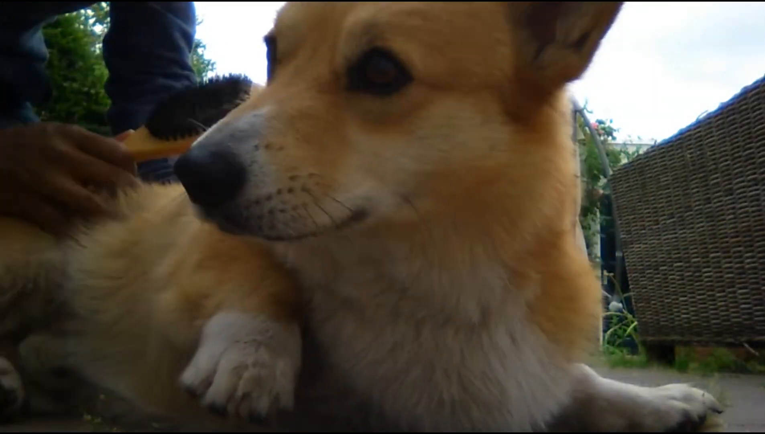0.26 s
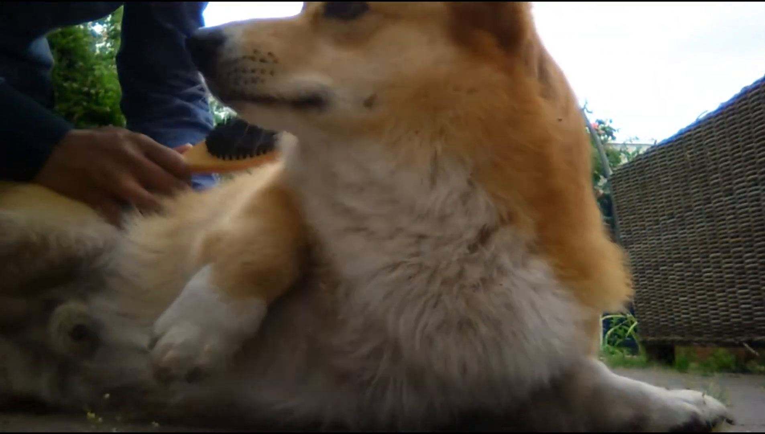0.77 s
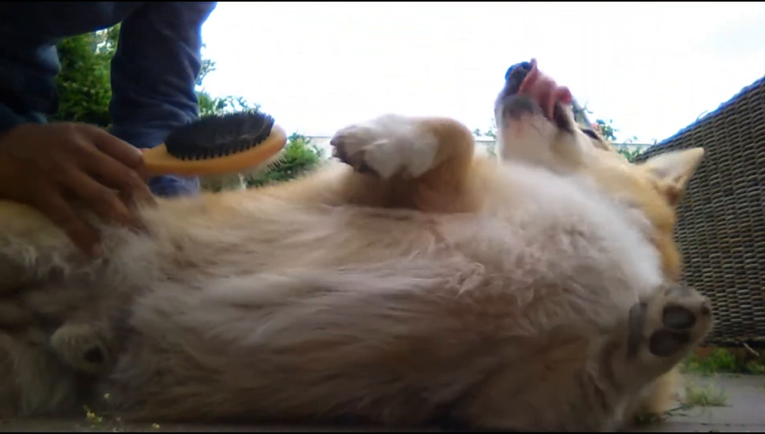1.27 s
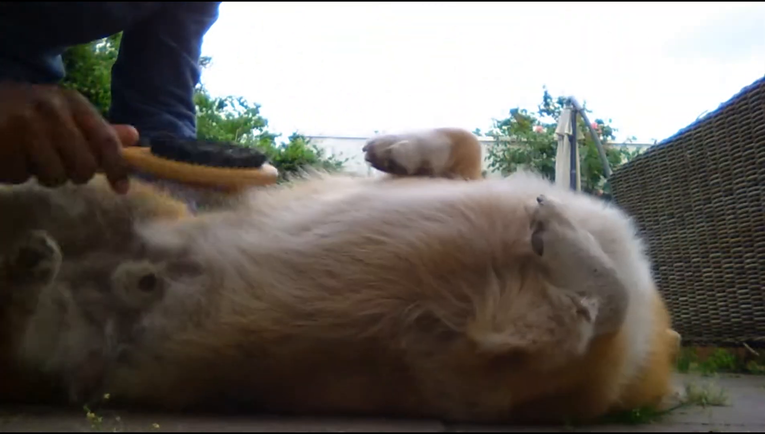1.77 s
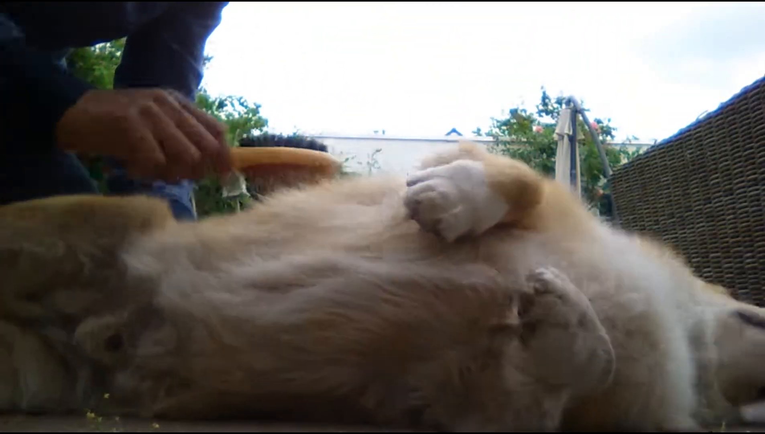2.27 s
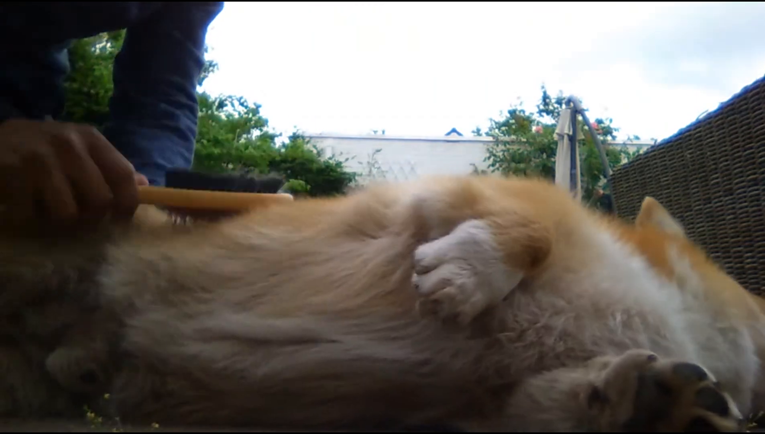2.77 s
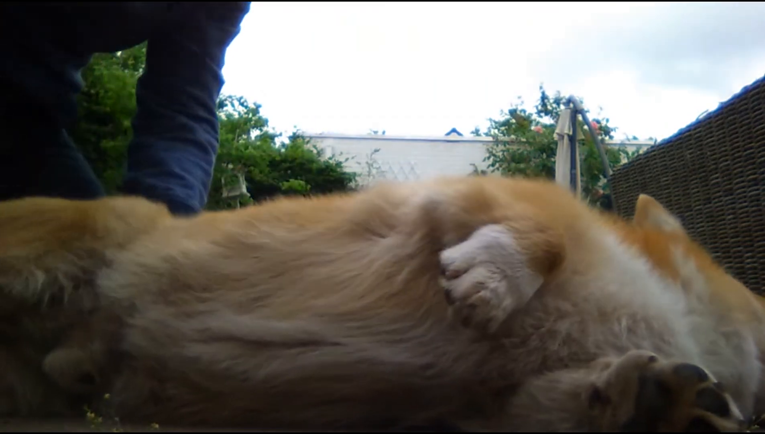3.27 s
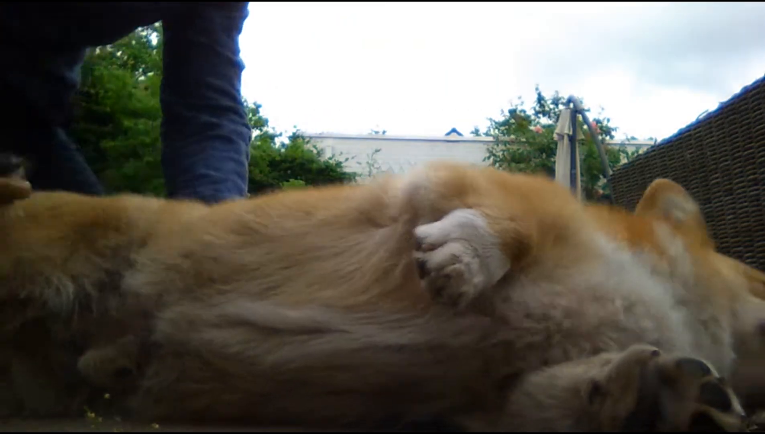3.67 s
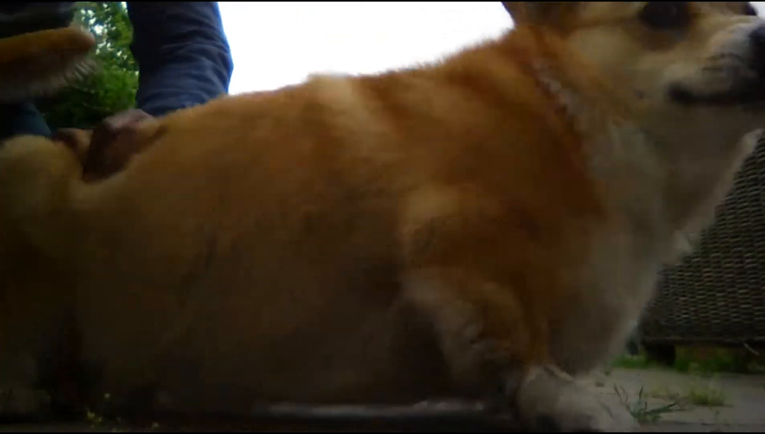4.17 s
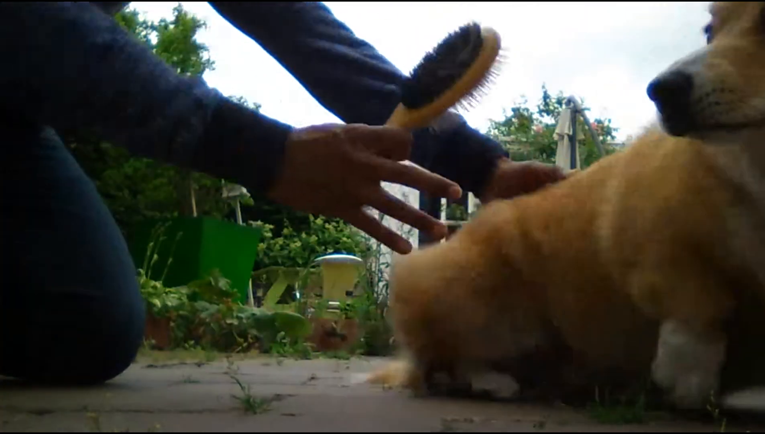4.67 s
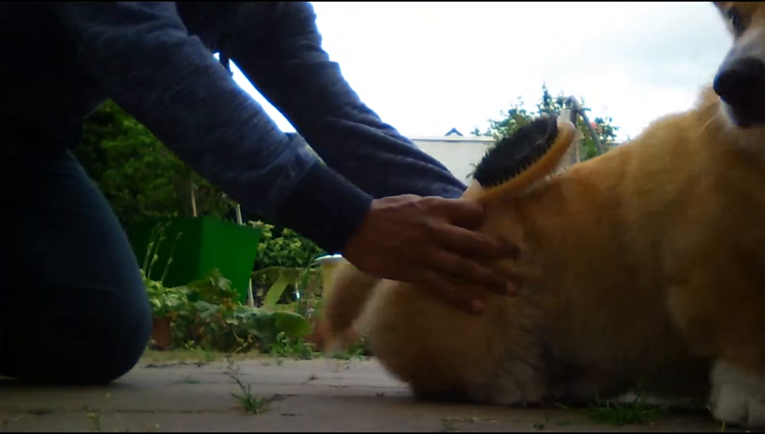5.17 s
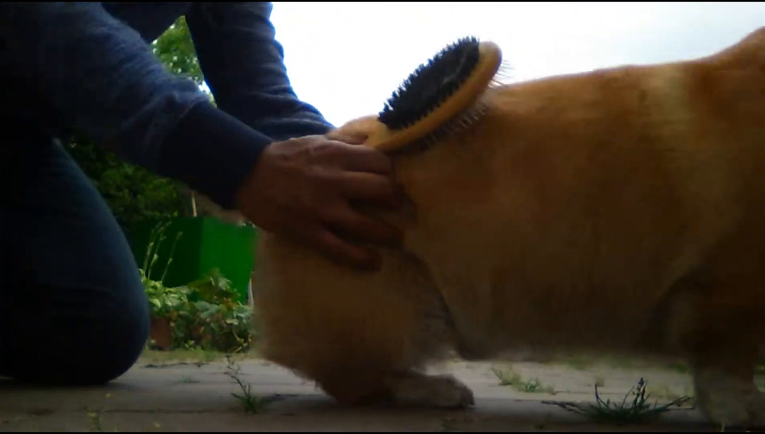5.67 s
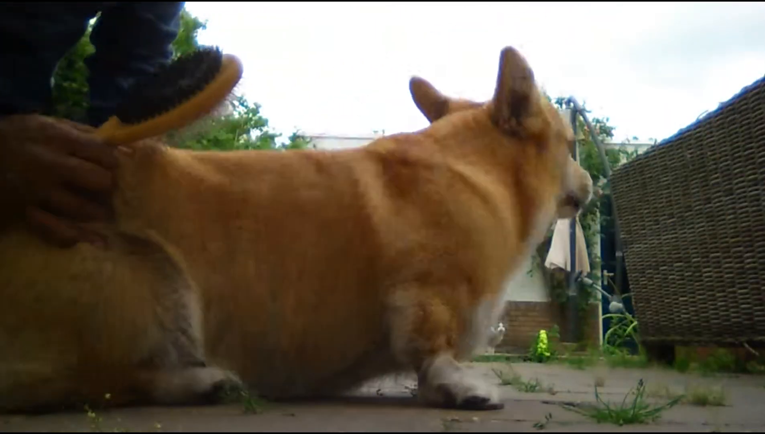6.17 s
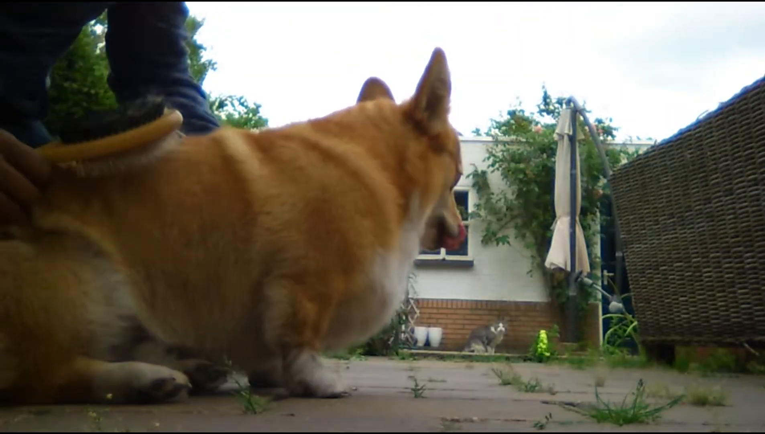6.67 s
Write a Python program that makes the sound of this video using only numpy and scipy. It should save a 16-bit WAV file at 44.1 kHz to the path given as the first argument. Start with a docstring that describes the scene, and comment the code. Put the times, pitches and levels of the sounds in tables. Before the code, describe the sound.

Faint brush strokes through dog fur and soft low knocks on a quiet patio, then a loud hollow clattering scramble and fading rustle.

```python
"""Dog brushed on a patio

On a garden patio a small recorder lies close to the paving while a dog is brushed beside it.
Bristles, hands and paws rustle in the coat and on the slabs: shaped noise, clicks and tiny twangs.
The dog's shifting weight drags and knocks on something hollow near the microphones: struck, ringing modes.
Soft thuds, short hoots and thin tones appear; filtered noise makes the wind, garden air and recorder hiss."""
import sys
import numpy as np
from scipy import signal
from scipy.fft import rfft, irfft, next_fast_len
from scipy.io import wavfile
from scipy.ndimage import uniform_filter1d

SR = 44100
rng = np.random.default_rng(int(sys.argv[2]) if len(sys.argv) > 2 else 0)


def dump(signal):
    """Clip the signal to [-1, 1] and save it as 16-bit WAV at the path in sys.argv[1]."""
    limited = np.clip(np.atleast_2d(signal).T, -1, 1)
    pcm = np.round(limited * 32767).astype(np.int16)
    wavfile.write(sys.argv[1], SR, pcm)


N = 305786
LONG = next_fast_len(N)
T, HZ = np.arange(N) / SR, np.fft.rfftfreq(LONG, 1 / SR)


def amp(db):
    """Decibels to amplitude."""
    return np.exp(np.asarray(db) * (np.log(10) / 20))


def evened(x):
    """Scales x to rms 1."""
    return x / np.sqrt(np.mean(x ** 2) + 1e-20)


def filtered(x, gain):
    """Multiplies the spectrum of x by a gain curve on HZ."""
    return irfft(rfft(x, LONG) * gain, LONG)[..., :N]


def read(points, hz=HZ):
    """Columns of a spectrum table, joined on a log-frequency axis."""
    f, *values = np.transpose(points)
    return [np.interp(np.log(hz + 1), np.log(f + 1), v) for v in values]


def follow(table, rest_db=-120):
    """Columns of a curve table at every sample; outside it the level falls to rest."""
    (first_s, _, *first_rest), (last_s, _, *last_rest) = table[0], table[-1]
    before, after = (first_s - .01, rest_db, *first_rest), (last_s + .01, rest_db, *last_rest)
    s, *values = np.transpose([before, *table, after])
    return [np.interp(T, s, v) for v in values]


def coloured(x, points):
    """Filters x to a spectrum; rms 1."""
    return evened(filtered(x, amp(read(points)[0])))


def flutter(per_s):
    """Slow chance of rms 1: noise kept below about per_s Hz."""
    return evened(filtered(rng.standard_normal(N), 1 / (1 + (HZ / per_s) ** 4)))


def grains(per_s, spread_db):
    """Sparse clicks of random sign, a few of them large; rms 1."""
    size = amp(spread_db * np.minimum(rng.exponential(1, N), 5)) * rng.choice([-1., 1.], N)
    return evened(size * (rng.random(N) < per_s / SR))


def add(mix, s, sound):
    """Lays a sound into the mix from s seconds on, cut at the end of the mix."""
    part = mix[round(s * SR):][:len(sound)]
    part += sound[:len(part)]


def pair(source, table):
    """Two microphone ports hear a source; where they are unlike, the left mixes in a second playing."""
    like, lead, balance_db = read(table)
    like, left = np.clip(like, 0, 1), amp(balance_db)
    x, other = rfft(source(), LONG), rfft(source(), LONG)
    mean = np.sqrt(1 + left ** 2 + 2 * left * like * np.cos(lead)) / 2  # level of the two ports' average
    left_port = left * (like * np.exp(1j * lead) * x + np.sqrt(1 - like ** 2) * other)
    return irfft([left_port, x] / mean, LONG)[:, :N]


# gusts on the ports: top_s, top_level_db, fade_db_per_s
GUSTS = [(0.0, -56, 22), (0.65, -46.5, 34), (2.1, -52.5, 33), (3.01, -48, 20), (3.9, -40.5, 35),
         (5.75, -49.5, 32), (6.7, -52.5, 9)]
# colour of the wind rumble at the ports: frequency_hz, density_db_per_hz (relative)
WIND_SPECTRUM = [(12, 2), (20, 2), (59, 3), (140, -9.5), (200, -10), (260, -43), (440, -120)]
# colour of the distant garden air: frequency_hz, density_db_per_hz (relative)
AIR_SPECTRUM = [(47, -40), (80, -9), (289, -9.5), (523, -18), (717, -15.5), (1150, -18.5), (1710, -25.5),
                (4250, -28.5), (5830, -34), (7240, -43.5), (9000, -36), (11700, -74), (19800, -120)]
AIR_DB, BREEZE_DB, GUST_RISE_DB_PER_S = -61.5, -57, 180


def outdoors():
    """Lumpy bass wind, with gusts that rise fast and fade slowly, over the garden's soft wash and thin tones."""
    gusts_db = []
    for top_s, db, fade in GUSTS:
        fall_db = np.where(T < top_s, GUST_RISE_DB_PER_S * (top_s - T), fade * (T - top_s))
        gusts_db.append(db - fall_db)
    level_db = np.maximum(np.max(gusts_db, axis=0), BREEZE_DB)
    wind = coloured(rng.standard_normal(N), WIND_SPECTRUM) * amp(level_db + 2.16 * flutter(6.6))
    air = coloured(rng.standard_normal(N), AIR_SPECTRUM) * amp(AIR_DB + 0.09 * flutter(4.5))
    return wind + air + tones()


# short thin tones, most of them faint: start_s, length_s, first_pitch_hz, last_pitch_hz, level_db
TONES = [(0.0, .18, 1193, 1190, -64), (1.32, .12, 1175, 1200, -63), (1.39, .15, 1335, 1360, -64),
         (1.33, .08, 570, 680, -63), (.872, .07, 675, 630, -52), (6.17, .25, 725, 740, -68),
         (6.53, .2, 365, 395, -65)]


def tones():
    """Thin gliding sines whose pitch and level waver, faded at both ends."""
    out, waver, drift = np.zeros(N), flutter(32), flutter(32)
    for s, length, first_hz, last_hz, db in TONES:
        count = round(length * SR)
        hz = np.linspace(first_hz, last_hz, count) * (1 + .005 * drift[round(s * SR):][:count])
        add(out, s, amp(db) * signal.windows.tukey(count, .4) * np.sin(2 * np.pi * np.cumsum(hz) / SR))
    return out * amp(2.2 * waver)


def handled():
    """All that reaches the ports through the hollow thing, which passes no deep bass."""
    return signal.sosfilt(signal.butter(4, 95, "high", fs=SR, output="sos"), drag() + knocks())


# modes of the hollow thing near the microphones: pitch_hz, level_db (relative), t60_s (each use scales it)
HOLLOW = [(155.6, -2.5, 0.52), (201.7, 1, 0.23), (298.8, -0.5, 0.22), (346, -6, 0.25), (398.6, -7, 0.21),
          (497.3, -4.5, 0.18), (632, -0.5, 0.055), (729, -4.5, 0.13), (851.5, -4.5, 0.07), (1098, -9, 0.09),
          (1420, -17, 0.14), (1738, -19.5, 0.076), (2140, -25, 0.088), (2293, -11.5, 0.023),
          (2556, -27, 0.2), (2900, -12, 0.018)]


def ring(hard_db, longer, luck_db=0, phases=0, bend=1):
    """The hollow thing's modes after one impulse; a harder blow lifts the upper ones."""
    hz, db, t60 = np.transpose(HOLLOW)[:, :, None]
    t, sign = T[:SR // 3], (-1) ** np.arange(len(HOLLOW))[:, None]
    decay_db = 60 * t / (t60 * longer)
    size = sign * amp(db + luck_db + hard_db * np.log2(hz / 300) - decay_db)
    return (size * np.sin(2 * np.pi * hz * bend * t + phases)).sum(0)


# blows on the hollow thing: start_s, level_db, hardness_db_per_octave, ring_time_factor,
# favoured_pitch_hz (that of the struck spot)
KNOCKS = [(0.0, -49.5, 5, 1, 202), (0.291, -45.5, 1, 1.12, 346), (0.33, -54.5, 1, 2.1, 785),
          (0.473, -51.5, 0.5, 1.1, 290), (0.699, -48.5, -1, 0.83, 272), (0.828, -38.5, 2, 0.55, 372),
          (0.855, -39.5, 2.5, 0.41, 850), (0.874, -46.5, 5, 1.4, 630), (1.123, -51.5, -5.5, 1.2, 400),
          (1.613, -51, 5.5, 1.5, 288), (1.811, -40.5, 0, 0.82, 330), (2.475, -50.5, 5.5, 1.6, 346),
          (3.355, -41.5, 5.5, 1.5, 810), (3.39, -39, -1, 1.3, 795), (3.472, -34.5, 7, 0.37, 385),
          (3.487, -25, 2.5, 0.41, 292), (3.497, -18, -2, 1.11, 177.6), (3.607, -20.5, -1.5, 1.12, 740),
          (3.708, -29, -1.5, 1.46, 780), (3.725, -21.5, 0.5, 0.2, 173), (3.753, -31, 1, 0.17, 181),
          (3.781, -26, -1.5, 0.51, 204), (3.824, -28, -8.5, 1.1, 196), (3.886, -29.5, -14.5, 0.85, 343),
          (3.927, -20, 5, 1.1, 950), (3.958, -24.5, 1, 0.52, 290), (4.031, -28, -4, 0.72, 484),
          (4.111, -38, 5.5, 1.1, 308), (4.171, -38, 7, 0.68, 860), (4.211, -33, 1, 1.4, 204),
          (4.305, -36.5, -24, 0.25, 195)]
CONTACT_S = 0.0024
CHATTER, CHATTER_S = .5, .006  # largest share of a rebound, typical delay
WOBBLE_DB = 3.2  # random wobble of each mode's level
DETUNE = .03  # largest share of a mode's pitch
FAVOUR_DB, FAVOUR_OCTAVES = 11.5, 0.22


def knocks():
    """Blows on different spots start the modes in other mixes, detune them a little at random, and rebound."""
    out, luck = np.zeros(N), rng.uniform(-0.857, 1, (len(KNOCKS), 3, len(HOLLOW), 1))
    modes_hz, wobble = np.transpose(HOLLOW)[0][:, None], np.tile(flutter(37), 2)
    t = T[:SR // 3]
    for (s, db, hard_db, longer, spot_hz), (size, start, detune) in zip(KNOCKS, luck):
        octaves_off = np.log2(modes_hz / spot_hz)
        mix_db = 4 * size + FAVOUR_DB * np.exp(-(octaves_off / FAVOUR_OCTAVES) ** 2)
        # the wobble is read from another place per mode
        mix_db = mix_db + WOBBLE_DB * wobble[(abs(size) * N).astype(int) + np.arange(len(t))]
        sound = ring(hard_db, longer, mix_db, np.pi * start, 1 + DETUNE * detune)
        sound = sound * (1 - np.exp(-t / CONTACT_S))  # builds over the contact time
        for share, lag in zip(start[:3, 0], detune[:3, 0]):  # rebounds of random size and delay
            delay_s = CHATTER_S * (1 + lag)
            rebound = np.roll(sound, round(delay_s * SR)) * (t > delay_s)
            sound = sound + CHATTER * share * rebound
        add(out, s, amp(db) * sound / np.sqrt(np.mean(sound[:900] ** 2)))
    return out


# small shifts of weight that rub the hollow thing: start_s, length_s, level_db,
# scrape_db (upper modes over lower)
SHIFTS = [(0.225, 0.33, -60.5, 6), (0.772, 0.14, -60.5, 16.5), (1.04, 0.25, -65.5, 9.5),
          (1.762, 0.18, -53, -31), (2.429, 0.23, -54.5, -2.5), (2.9, 0.41, -53.5, -1.5)]
SHIFT_EDGE_S = 0.05
# the dog scrambles up, dragging on the hollow thing: time_s, level_db, scrape_db (upper modes over lower)
SCRAMBLE = [(3.357, -38.5, 4.5), (3.42, -38.5, 5.5), (3.51, -31.5, 5), (3.53, -55.5, 6), (3.69, -58, 5),
            (3.76, -37, -2.5), (3.856, -31, -1.5), (4.18, -37, -4.5), (4.312, -43, 4), (4.45, -71, -48)]


def drag():
    """Dense slips excite modes damped short by the rubbing weight; a scrape reaches the upper modes."""
    level_db, scrape_db = follow(SCRAMBLE)
    low, high = amp(level_db), amp(level_db + scrape_db)
    for s, length, db, more_db in SHIFTS:
        shape = signal.windows.tukey(round(length * SR), min(2 * SHIFT_EDGE_S / length, 1))
        add(low, s, amp(db) * shape)
        add(high, s, amp(db + more_db) * shape)
    slips = grains(1100, 3.8) * amp(2.12 * flutter(53))
    body = ring(0.14, 0.3)
    body = rfft(body / np.linalg.norm(body), LONG)
    upper = 1 / (1 + (380 / (HZ + 1)) ** 6)
    return filtered(slips * low, body * (1 - upper)) + filtered(slips * high, body * upper)


# claw and bristle ticks: start_s, peak_db, treble_tilt_db_per_octave, t60_s
TICKS = [(0.27, -59, 4.5, 0.072), (1.6127, -50, -4.5, 0.042), (2.477, -45.5, 2, 0.089),
         (3.164, -43, -7.5, 0.054), (3.18, -35, 4, 0.042), (3.3547, -34, 1.5, 0.071),
         (3.4851, -18.5, -4.5, 0.049), (3.6068, -18, -7.5, 0.062), (3.706, -19.5, -6.5, 0.063),
         (3.779, -26, 1, 0.057), (3.799, -26, 8, 0.04), (3.8244, -24.5, -5, 0.12), (3.888, -20, 11, 0.027),
         (3.927, -18, -4, 0.12), (3.997, -31.5, 15, 0.061), (4.031, -19.5, -6.5, 0.11),
         (4.062, -24, 7, 0.026), (4.111, -24, -7.5, 0.12), (4.171, -24.5, 0, 0.29),
         (4.3077, -30, -1.5, 0.09), (4.327, -33, 1, 0.091), (4.4144, -31, 14, 0.018),
         (4.594, -32.5, 0.5, 0.11), (4.6514, -38, -4, 0.2), (4.7012, -20.5, 6.5, 0.019),
         (4.7064, -27.5, 1.5, 0.012), (4.7552, -40, 4, 0.014), (5.021, -40, 0, 0.092),
         (5.0857, -32, 13, 0.018), (5.0914, -41, 0, 0.014), (5.7232, -36, 4, 0.03)]
# colour of the coat close by, shared by ticks and rustle: frequency_hz, density_db_per_hz (relative)
FUR = [(530, -7), (900, -1), (1030, -11), (1130, -0.5), (1600, -7), (1790, -4), (4980, -4), (7580, -17.5),
       (10900, -10), (14500, -18), (16000, -24)]
GRIT_DB = 5  # spikiness of a tick's noise: random gain from sample to sample


def ticks():
    """Fur-coloured noise with a sharp start and a short gritty tail."""
    out, hz, t = np.zeros(N), np.fft.rfftfreq(4096, 1 / SR), T[:4096]
    noise = rng.standard_normal((len(TICKS), 2, 4096))
    for (s, db, tilt_db, t60), (n, grit) in zip(TICKS, noise):
        colour = amp(read(FUR, hz)[0] + tilt_db * np.log2(hz / 5000 + 0.0021))
        no_bass = 1 / (1 + (140 / (hz + 1)) ** 4)
        n = irfft(rfft(n * amp(GRIT_DB * grit)) * colour * no_bass)
        sound = n * amp(-60 * t / t60) * np.minimum(t / 0.00084, 1)
        add(out, s, amp(db) * sound / abs(sound).max())
    return out


# soft thuds through the ground: start_s, level_db (before swell and decay), pitch_hz
THUDS = [(0.646, -37.5, 82.6), (0.74, -36, 52), (2.039, -37.5, 67), (2.126, -45, 62.6), (2.997, -33, 58.4),
         (3.374, -31, 64), (3.429, -27, 65.4), (3.49, -21, 70), (3.609, -34, 96), (5.716, -36.5, 62),
         (6.695, -34, 66)]
THUD_T60_S = 0.2


def thuds():
    """A few slow sine cycles that swell and die."""
    out, t = np.zeros(N), T[:SR // 2]
    for s, db, hz in THUDS:
        swell = np.minimum(t / 0.024, 1)
        add(out, s, amp(db - 60 * t / THUD_T60_S) * np.sin(2 * np.pi * hz * t) * swell)
    return out


# short low hoots: middle_s, level_db (at the top of the swell), pitch_hz (at the middle), length_s
HOOTS = [(.778, -30, 233, 0.038), (0.94, -32, 240, 0.042), (1.85, -40, 212, 0.089)]
HOOT_OCTAVE_DB = -22


def hoots():
    """A rounded tone that sags in pitch, with a weak octave."""
    out = np.zeros(N)
    for s, db, hz, length in HOOTS:
        t = np.arange(-length / 2, length / 2, 1 / SR)
        turn = 2 * np.pi * hz * t * (1 - .17 * t / length)
        tone = np.sin(turn) + amp(HOOT_OCTAVE_DB) * np.sin(2 * turn)
        add(out, s - length / 2, amp(db) * np.hanning(len(t)) * tone)
    return out


# soft brush strokes: middle_s, level_db (at the top of the swell), length_s, centre_hz
STROKES = [(0.869, -57.5, 0.035, 1700), (0.858, -64.5, 0.17, 2900), (0.993, -56.5, 0.023, 775),
           (1.376, -55, 0.25, 1050), (1.627, -51.5, 0.08, 590), (1.814, -50, 0.12, 540),
           (2.21, -53, 0.11, 453), (2.617, -53.5, 0.14, 475), (2.974, -51.5, 0.083, 460),
           (3.165, -52, 0.15, 755), (3.396, -49.5, 0.16, 1460), (3.836, -46.5, 0.058, 1800),
           (3.9, -35, 0.054, 1270), (4.509, -48, 0.091, 765), (5.061, -54, 0.052, 2050)]


def strokes():
    """Bristles drag through dense fur: a swell of grainy noise with a hump at its centre, trailing off upward."""
    out, hz = np.zeros(N), np.fft.rfftfreq(16384, 1 / SR)
    noise = rng.standard_normal((len(STROKES), 2, 16384))
    for (s, db, length, centre_hz), (n, grit) in zip(STROKES, noise):
        u, count = hz / centre_hz, round(length * SR)
        hump = 1 + 2.8 * np.exp(-(np.log(u + 1e-9) / 0.48) ** 2)
        slope = u ** 1.03 / (1 + u ** 1.59) / (1 + (hz / 4500) ** 3)
        n = evened(irfft(rfft(n * amp(1.2 * grit)) * hump * slope))
        add(out, s - length / 2, amp(db) * np.hanning(count) * n[:count])
    return out


def bristles():
    """Each bristle springs free and twangs for a few cycles at its own pitch."""
    flicks, which, out = grains(1000, 3), rng.integers(0, 12, N), np.zeros(N)
    for k, hz in enumerate(np.geomspace(1500, 6200, 12)):
        r = np.exp(-.13 * hz / SR)  # decay per sample
        resonator = [1, -2 * r * np.cos(2 * np.pi * hz / SR), r * r]
        out += hz ** 1.5 * signal.lfilter([1], resonator, flicks * (which == k))
    return evened(out)


# ruffles of the coat: middle_s, level_db (at the top of the swell), length_s,
# sheen_db (above 7.5 kHz, over the rest)
RUFFLES = [(1.623, -75.5, 0.051, 10.5), (3.158, -58, 0.18, 0), (3.316, -62.5, 0.25, -2.5),
           (3.393, -52, 0.11, 2), (3.471, -47.5, 0.052, -12), (3.718, -45, 0.044, 4),
           (3.937, -47, 0.054, -1.5), (4.042, -44, 0.24, -1.5), (4.197, -45, 0.087, 6),
           (4.352, -53, 0.034, -4), (4.656, -53, 0.022, 5.5), (4.742, -57, 0.11, 0), (5.171, -64, 0.046, 1),
           (5.296, -55, 0.096, 7.5), (5.419, -61.5, 0.14, 4), (5.586, -66, 0.25, 2.5),
           (5.723, -54, 0.054, 2.5), (5.888, -68, 0.29, -1), (6.102, -61.5, 0.07, 3.5),
           (6.173, -63, 0.072, 8.5)]
# rising and falling rustle of coat and hands, from the scramble on: time_s, level_db
COAT = [(3.77, -61), (3.99, -58), (4.37, -50), (4.42, -59.5), (4.78, -67), (4.85, -70), (5.22, -71.5),
        (5.33, -59.5), (5.7, -68), (5.76, -73), (5.8, -69), (6.1, -70), (6.35, -76.5)]
PATCH_DB = 2.8  # random patchiness of the rustle over pitch and time
TWANG = .55  # bristles against the hiss of hairs
LIGHT_S, LIGHT_HZ = 4.8, 1970  # from then on the touch is light and the coat thins out below that pitch


def rustle():
    """Hiss of many hairs with a crackle of single bristles and a separately levelled treble sheen."""
    level = amp(follow(COAT)[0])
    sheen = level.copy()
    for s, db, length, sheen_db in RUFFLES:
        swell = np.hanning(round(length * SR))
        add(level, s - length / 2, amp(db) * swell)
        add(sheen, s - length / 2, amp(db + sheen_db) * swell)
    hairs = rng.standard_normal(N) + 1.5 * grains(1200, 3.2) + TWANG * bristles()
    hairs = hairs * amp(1.22 * flutter(31))
    z = signal.stft(hairs, nperseg=256)[2]
    patches = uniform_filter1d(rng.standard_normal(z.shape), size=5, axis=0)
    patches = evened(uniform_filter1d(patches, size=7, axis=1))
    hairs = signal.istft(z * amp(PATCH_DB * patches), nperseg=256)[1][:N]
    fur, upper = amp(read(FUR)[0]), 1 / (1 + (7500 / (HZ + 1)) ** 12)
    full = filtered(hairs, fur * (1 - upper))
    light = filtered(hairs, fur * (1 - upper) / (1 + (LIGHT_HZ / (HZ + 1)) ** 4))
    body = np.where(T < LIGHT_S, evened(full), evened(light))
    return level * body + sheen * evened(filtered(hairs, fur * upper))


# side of the rustle and ticks at the pair: time_s, left_over_right_db (added to the pair's own)
RUSTLE_SIDE = [(0, -34), (4.3, 0.5), (4.6, -0.5), (6.9, -1)]
# microphone pair for sounds close by: frequency_hz, likeness (0-1), left_lead_rad, left_over_right_db
NEAR = [(40, 1, 4.04, -4), (223, 0.99, 2.39, -6), (577, 0.93, 2.1, -7), (1230, 0.5, 0.3, -6.5),
        (2390, 0, 3.3, -6.5), (4900, 0.22, 1.63, 0.5), (6800, 0.06, 0.25, -0.5), (15000, 0, .6, -15)]
# microphone pair for wind, air and thin tones: frequency_hz, likeness (0-1), left_lead_rad, left_over_right_db
FAR = [(39.7, 0.84, 3.14, -2), (200, 0.99, 2.6, -4.5), (573, 0.86, 2.43, -5.5), (1320, 0.045, 6.4, -6.5),
       (4430, 0.061, 8.4, -2), (9000, .1, 1.1, -4)]


def scene():
    """Coat, handling and brushing close to the pair, with the outdoors around them."""
    s, side_db = np.transpose(RUSTLE_SIDE)
    side_db = np.interp(T, s, side_db)
    coat = pair(lambda: rustle() + ticks(), NEAR) * amp([side_db / 2, -side_db / 2])
    close = pair(lambda: handled() + thuds() + hoots() + strokes(), NEAR)
    return coat + close + pair(outdoors, FAR)


# colour of the recorder's treble hiss: frequency_hz, density_db_per_hz (relative)
HISS_SPECTRUM = [(5000, -74), (8500, -35), (9350, -8.5), (11200, -1), (11800, -3.5), (12800, -2),
                 (14900, -7.5), (16000, -12.5)]
# thin recorder tones in the right input: pitch_hz, level_db (flutters around this)
WHINE = [(9717, -66), (11800, -66)]
HISS_LEFT_DB, HISS_RIGHT_DB = -74.5, -58
EDGE_HZ = 16000


def record(dry):
    """The right input adds treble hiss and thin tones, the left fainter hiss; then a soft limit and band limits."""
    hiss = np.array([coloured(n, HISS_SPECTRUM) for n in rng.standard_normal((2, N))])
    hiss *= amp([[HISS_LEFT_DB], [HISS_RIGHT_DB]])
    for hz, db in WHINE:
        hiss[1] += amp(db + 2 * flutter(12)) * np.sin(2 * np.pi * hz * T)
    mixed = dry + hiss
    mixed = mixed / (1 + (mixed / .9) ** 6) ** (1 / 6)  # a soft limit keeps the loudest peaks in range
    mixed = signal.sosfilt(signal.butter(2, 30, "high", fs=SR, output="sos"), mixed)
    lowpass = signal.firwin(255, EDGE_HZ, window=("kaiser", 9), fs=SR)
    return signal.oaconvolve(mixed, lowpass[None], "same")


dry = scene()
out = record(dry)
dump(out)
```